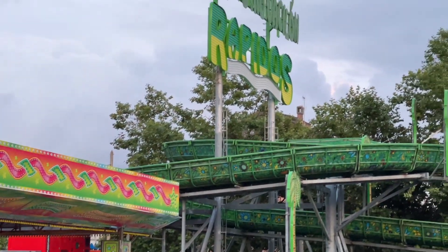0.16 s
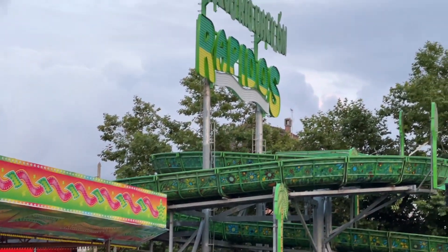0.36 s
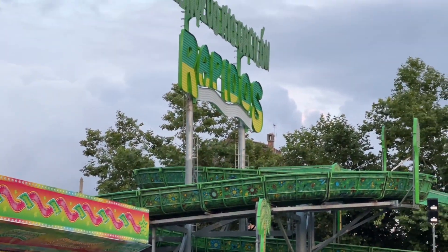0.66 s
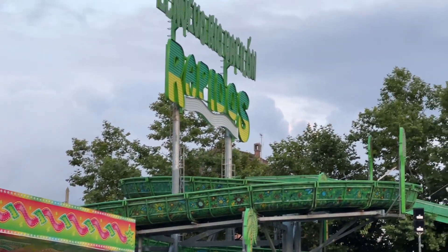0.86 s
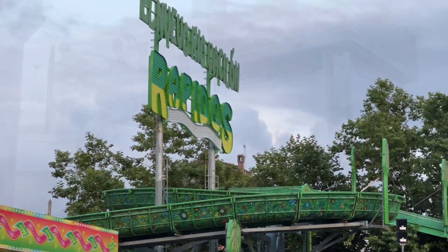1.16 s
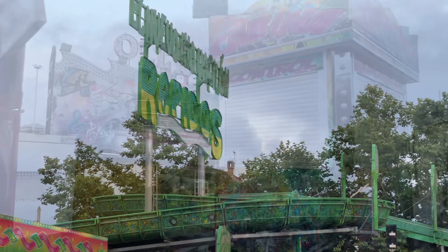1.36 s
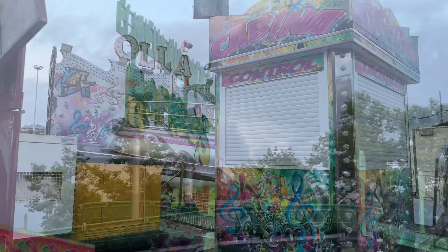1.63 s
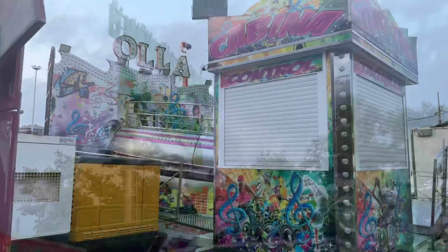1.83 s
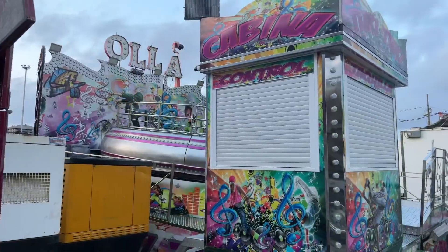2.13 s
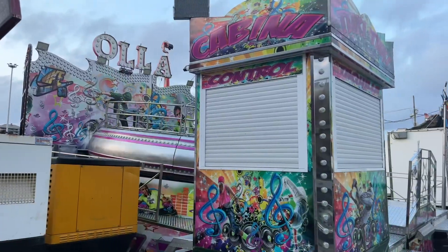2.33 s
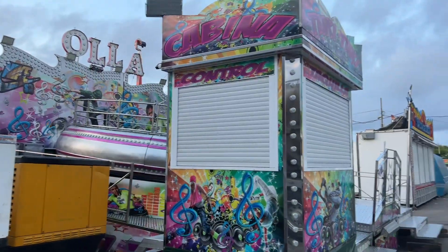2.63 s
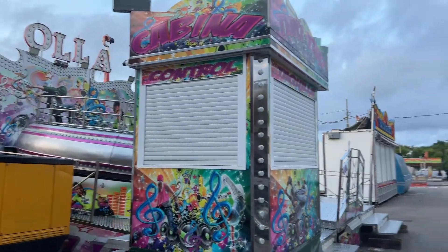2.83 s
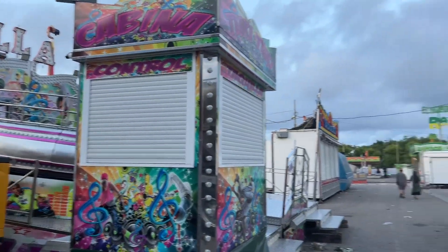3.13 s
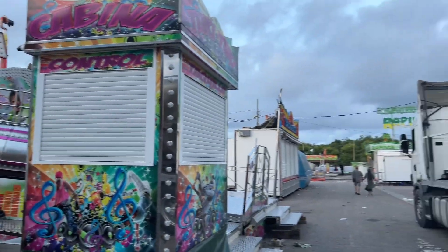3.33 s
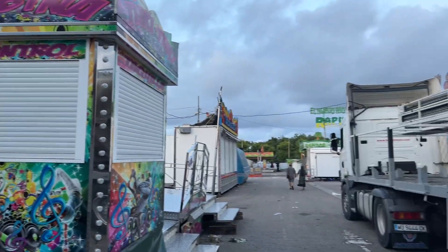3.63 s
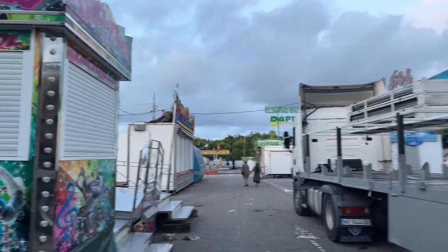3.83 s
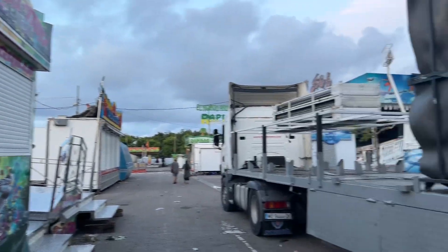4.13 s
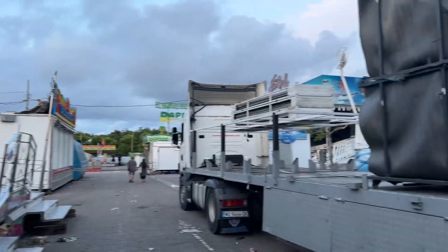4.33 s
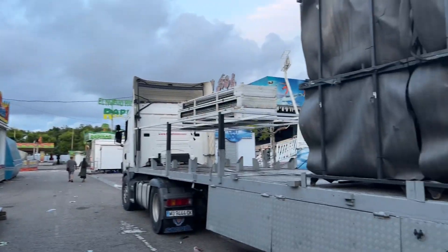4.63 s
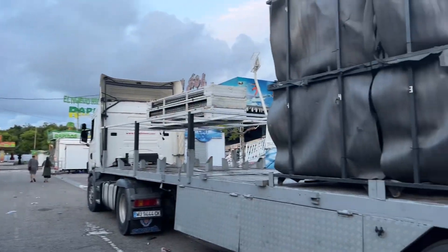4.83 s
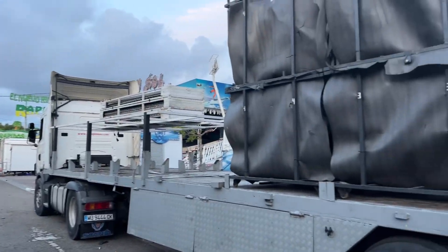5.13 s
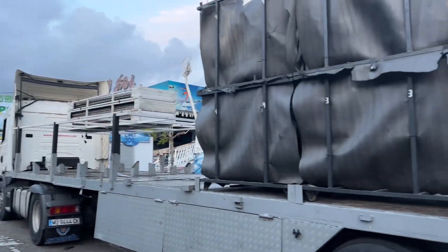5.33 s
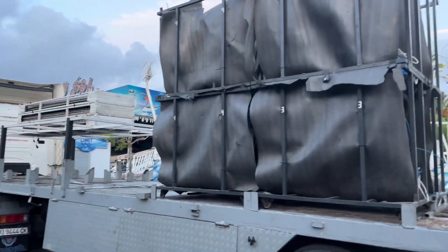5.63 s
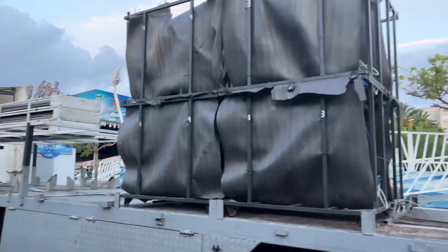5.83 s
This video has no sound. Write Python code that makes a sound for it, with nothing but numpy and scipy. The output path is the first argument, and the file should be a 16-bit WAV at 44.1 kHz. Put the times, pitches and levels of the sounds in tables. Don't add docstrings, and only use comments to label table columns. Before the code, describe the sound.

Quiet far traffic and a brief splash give way to a steady engine drone nearby, with fan hiss, high whine and faint squeals.

```python
import sys
import numpy as np
from scipy import signal
from scipy.fft import rfft, irfft, next_fast_len
from scipy.io import wavfile
from scipy.ndimage import uniform_filter1d

SR = 44100
rng = np.random.default_rng(int(sys.argv[2]) if len(sys.argv) > 2 else 0)


def log_audio(samples):
    frames = np.atleast_2d(samples).T
    limited = np.clip(frames, -1, 1)
    pcm = np.round(limited * 32767).astype(np.int16)
    wavfile.write(sys.argv[1], SR, pcm)


def makeup_ratio(level_db):
    decades = np.asarray(level_db, float) / 20
    return 10 ** decades


N = 263718
HOP = 256
T = np.arange(N) / SR
HZ = np.arange(2 * HOP + 1) * SR / (4 * HOP)
FRAMES = np.arange(N // HOP + 2) * HOP / SR

# (time [s], share of the straight sound that bounces off the lorry [0-1])
TURN = [
    (2.8, 0.034),
    (3.6, 0.17),
    (4.3, 0.8),
    (5.98, 1.),
]
# (time [s], share of full amplitude [0-1])
ARRIVAL = [
    (1.13, 0.0073),
    (1.4, 0.18),
    (1.7, 0.44),
    (2.15, 0.71),
]
PARK_FADE_S = 1, 2.4
CLOSING_S = 4.15, 6
LEFT_LAG_MS = 0.25, -0.332
PORT_GAP_M, MIC_LOW_HZ = 0.13, 28

# (multiple of the firing rate, level [dB], left minus right [dB])
EXHAUST = [(2, 4, -0.5), (3, 7, -5.5), (4, 4, 0.5), (5, -3.5, -8.5), (6, -13, 10), (7, -16.5, -11),
           (9, -15.5, -18), (11, -14.5, -1)]
FIRE_HZ, FIRE_START = 39.035, .436
SILENCER_BEND, SILENCER_LAG = -.17, .86

# (frequency [Hz], level [dB per Hz])
CASING = [(33, -6), (62, 1.5), (100, -2.5), (135, 2.5), (170, 0), (215, -7), (360, -3), (440, -5.5),
          (640, -13), (790, -5.5), (1150, -6.5), (1500, -12), (2300, -16.5), (4000, -41)]
# (frequency [Hz], level [dB per Hz])
FAN = [(1500, -12.5), (2300, -1), (2750, -0.5), (2950, -3.5), (4300, -2.5), (5200, 0.5), (7000, -0.5),
       (9000, -6), (10200, -9.5), (11200, -8.5), (13000, -11.5), (14600, -15), (15600, -14)]
# (frequency [Hz], left minus right [dB])
CASING_PAN = [(60, -3), (110, 0.5), (200, -5), (380, -2.0), (700, 0.0), (1290, 2), (2380, -2.5), (4400, 3),
              (8120, 2.5), (15000, -4.5)]
# (frequency [Hz], share that comes straight [0-1])
CASING_DIRECT = [(60, 0.47), (300, 0.49), (700, 0.64), (1500, 0.64), (3000, 0.55), (7000, 0.7), (10000, .4),
                 (14000, .1)]
# (frequency [Hz], phase by which they part the ports [radians])
ECHO_SPREAD = [(800, 0.042), (2000, 1.06), (3500, 2.36), (9000, 1.94), (14000, 3.5)]
EXHAUST_DB, CASING_DB, FAN_DB, LOUVRE_DB = -27, -33, -42.5, -0.8
LORRY_CASING_DB, LORRY_LOUVRE_DB = 1.94, 4
CLOSING_FAN_DB, CLOSING_LOUVRE_DB = 2.5, 2
LORRY_DIRECT = 1.14

# (frequency [Hz], width [Hz], level [dB])
PANELS = [(33, 5, -54), (51, 7, -47), (334, 5, -51), (421, 30, -52), (790, 100, -49.5), (1130, 40, -55),
          (1740, 160, -55), (2682, 32, -59), (6050, 90, -62), (7390, 27, -66.5), (11717, 80, -70)]
PANEL_DB = 36

WHISTLE_HZ = [4420, 4530, 4590, 4650, 4700, 4722, 4760, 4795, 4830, 4885]
WHISTLE_DB = [-4, 0, 5, -3, 4.5, 1, -1, 4, -1, 0]
WHISTLE_SLOPE = 0.058
WHISTLE_FOLLOW = .3
WHISTLE_SKIRT = 4630, 420, -8.5
WHISTLE_REST_HZ, SURGE_S = 4718, 0.04
# (time [s], level [dB])
BOOST = [(1.3, -35), (2.35, -37.5), (2.66, -35), (3.0, -37.5), (3.2, -40.5), (3.5, -37.5), (4.85, -39.5),
         (5.33, -33.5), (5.6, -35), (5.95, -35)]
# (time [s], pitch rise [Hz])
SURGES = [(1.86, 80), (2.12, 80.5), (2.588, 66), (2.88, 58), (3.45, 44.3), (3.63, 54.5), (4.35, 40),
          (4.75, 40), (5.0, 110), (5.52, 55.2), (5.97, 101.5)]
# (time [s], left minus right [dB])
WHISTLE_AIM = [
    (2.9, 3.5),
    (4.45, -2.5),
    (5.4, 7),
    (5.98, 7),
]

# (start [s], end [s], frequency [Hz], width [Hz], level [dB])
BRIEF = [
    (1.703, 2.8, 6800, 44, -52),
    (4.51, 5.031, 6885, 50, -50),
    (5.157, 5.34, 593, 14, -40),
    (5.824, 5.997, 491.8, 4, -37),
]

# (frequency [Hz], level [dB per Hz])
PARK = [(30, -22), (52, -2), (65, -6.5), (85, 0.5), (135, -13), (156, -4.5), (190, -13.5), (310, -16),
        (560, -22), (640, -28.5), (1140, -31), (1900, -35.5), (9500, -58.5), (14000, -74)]
# (frequency [Hz], likeness of left and right [0-1])
PARK_ALIKE = [(80, .98), (300, .87), (700, .45), (1500, .2), (2200, .85), (3800, .93), (4300, 1.),
              (8800, 1.), (9000, .2)]
PARK_DB = -39.5
# (frequency [Hz], level [dB per Hz])
SPRAY = [(290, -47), (500, -12), (543, -13), (839, -14), (911, -9.5), (3560, -21), (8640, -32),
         (13000, -80)]
# (time [s], level [dB])
GUSHES = [
    (0.12, -52),
    (0.19, -51),
    (0.245, -51.5),
    (0.295, -53.5),
]
GUSH_ATTACK_S, GUSH_FALL_DB_PER_S, TRICKLE_DB = 0.013, 46, -61.5

# (low [Hz], high [Hz], share of blocks silent [0-1])
SUM_DROPPED = [(9650, 10150, .95), (10150, 10380, 1), (10380, 10750, .6), (10750, 11050, .3),
               (13100, 14450, 1), (14450, 14750, .25), (15750, 22050, 1)]
# (low [Hz], high [Hz], share of blocks silent [0-1])
DIFFERENCE_DROPPED = [(11200, 11500, .2), (11500, 11700, .7), (11700, 12400, 1), (12400, 13050, .6),
                      (13050, 13300, .15), (14300, 14700, .25), (14700, 15200, .6), (15200, 22050, 1)]


def exhaust():
    crank = 2 * np.pi * (FIRE_HZ * T + FIRE_START) + 0.022 * walk(3.06)[0]
    breath = walk(5.5, count=len(EXHAUST))
    hum = 0
    for (k, db, pan), b in zip(EXHAUST, breath):
        wave = np.cos(k * crank + SILENCER_BEND * (k - 3) ** 2 - SILENCER_LAG)
        hum = hum - makeup_ratio(db + .9 * b) * wave * sides(pan)[:, None]
    return level(hum, EXHAUST_DB - 0.7)


def casing():
    closing = np.interp(FRAMES, CLOSING_S, [0, 1])
    louvre_db = LOUVRE_DB + LORRY_LOUVRE_DB * curve(TURN, FRAMES) + CLOSING_LOUVRE_DB * closing
    louvre_shape = np.exp(-np.log(HZ[:, None] / 2400 + 1e-9) ** 2 / 0.14)
    body = level(rush(CASING), CASING_DB, 0., 318.0, 1040.0)
    fan = level(rush(FAN, louvre_db * louvre_shape), FAN_DB, 0., 6020.0, 8130.0)
    body = body * makeup_ratio(LORRY_CASING_DB * curve(TURN, T))
    return body + fan * makeup_ratio(CLOSING_FAN_DB * np.interp(T, CLOSING_S, [0, 1]))


def panels():
    sway = walk(3.5, count=len(PANELS))
    hums = 0
    for (hz, width, db), s in zip(PANELS, sway):
        alike = .9 if hz < 500 else .4
        hums = hums + makeup_ratio(db + 3.3 * s) * ring(hz, width, alike)
    return hums * makeup_ratio(CASING_DB + LORRY_CASING_DB * curve(TURN, T) + PANEL_DB)


def whistle():
    turns = walk(3.3, count=len(WHISTLE_HZ))
    surge = sum(rise * np.exp(-((T - at) / SURGE_S) ** 2 / 2) for at, rise in SURGES)
    pitch = WHISTLE_REST_HZ + surge + 11. * walk(14)[0]
    bend = WHISTLE_FOLLOW * (pitch - pitch.mean())
    shaded_db = -8. * curve(TURN, T)
    skirt_hz, skirt_width, skirt_db = WHISTLE_SKIRT
    song = makeup_ratio(skirt_db) * ring(skirt_hz, skirt_width, 0.22)
    for hz, db, turn in zip(WHISTLE_HZ, WHISTLE_DB, turns):
        gain = makeup_ratio(db + 2. * turn - WHISTLE_SLOPE * abs(hz - pitch) + shaded_db * (hz < 4620))
        song = song + gain * ring(hz + bend, 24.3, 0.34)
    song = song / np.sqrt(uniform_filter1d(song ** 2, int(.2 * SR)))
    return song * makeup_ratio(curve(BOOST, T)) * sides(curve(WHISTLE_AIM, T) + 1.5 * walk(2.9)[0])


def rush(table, shift_db=0):
    bounce = np.clip(curve(TURN, FRAMES), 0, 1)
    share = np.clip(on_hz(CASING_DIRECT)[:, None] * LORRY_DIRECT ** bounce, 0, 1)
    straight = 0
    for lag_ms, part in zip(LEFT_LAG_MS, (1 - bounce, bounce)):
        turn = np.exp(-1j * np.pi * HZ * (HZ < 10000) * lag_ms / 1000)[:, None]
        straight = straight + np.sqrt(part) * grains() * np.array([turn, turn.conj()])
    echoes = np.exp(.5j * np.clip(on_hz(ECHO_SPREAD), 0, 3)[:, None] * field(5, 50))
    straight = straight * np.array([echoes, echoes.conj()])
    scattered = pair(np.sinc(2 * HZ * PORT_GAP_M / 343))
    spectra = np.sqrt(share) * straight + np.sqrt(1 - share) * scattered
    spectra = spectra * makeup_ratio(shift_db) * sides(on_hz(CASING_PAN))[:, :, None]
    unrest = patches(1.1, 3, 30) * patches(.9, 60, 5) * patches(1., 8, 8)
    return colour(sound(spectra * unrest), table)


def brief_tones():
    out = 0
    for start, end, hz, width, db in BRIEF:
        on = uniform_filter1d(1. * ((T > start) & (T < end)), int(0.026 * SR))
        tone = ring(hz, width, 0.96)
        out = out + makeup_ratio(db) * on * tone / np.sqrt(uniform_filter1d(tone ** 2, int(.1 * SR)))
    return out


def splash_gain():
    power = makeup_ratio(TRICKLE_DB) ** 2
    for start, db in GUSHES:
        rise = np.clip(1 + (T - start) / GUSH_ATTACK_S, 0, 1)
        fall = makeup_ratio(db - GUSH_FALL_DB_PER_S * np.maximum(T - start, 0))
        power = power + (rise * fall) ** 2
    return np.sqrt(power)


def park():
    alike = on_hz(PARK_ALIKE)
    far = colour(sound(pair(alike) * patches(1.9, 4, 20)), PARK)
    spray = colour(sound(pair(alike) * patches(1.1, 30, 6)), SPRAY)
    far = level(far, PARK_DB, 0., 28.8, 600.) * sides(-1.4)[:, None]
    return far + level(spray, -0.25, 0., 1800.0, 9000.) * splash_gain()


def level(x, db, start=0., lo_hz=20., hi_hz=17000.):
    band = signal.sosfilt(signal.butter(4, [lo_hz, hi_hz], "bandpass", fs=SR, output="sos"), x)
    return x * makeup_ratio(db) / np.sqrt(np.mean(band[..., int(start * SR):] ** 2))


def curve(table, t, column=1):
    rows = np.array(table, float)
    return np.interp(t, rows[:, 0], rows[:, column])


def on_hz(table, hz=HZ):
    rows = np.array(table, float)
    return np.interp(np.log(hz + 1), np.log(rows[:, 0]), rows[:, 1])


def walk(rate, count=1):
    k = int(SR / rate)
    held = np.repeat(rng.standard_normal((count, N // k + 1)), k, axis=1)
    return 1.21 * uniform_filter1d(uniform_filter1d(held, k), k)[:, :N]


def ring(hz, width, alike):
    noise = rng.standard_normal((3, N)) + 1j * rng.standard_normal((3, N))
    pole = np.exp(-np.pi * width / SR)
    mixed = np.sqrt(alike) * noise[0] + np.sqrt(1 - alike) * noise[1:]
    slow = signal.lfilter([1], [1, -2 * pole, pole ** 2], mixed)
    y = np.real(slow * np.exp(2j * np.pi * np.cumsum(hz + 0 * T) / SR))
    return y / y.std()


def sides(pan_db):
    return makeup_ratio(np.array([pan_db, -pan_db]) / 2)


def grains():
    noise = rng.standard_normal(N + HOP)
    return signal.stft(noise, nperseg=4 * HOP, noverlap=3 * HOP)[2][:, :len(FRAMES)]


def pair(alike):
    alike = np.clip(alike, -1, 1)[:, None]
    mid = np.sqrt((1 + alike) / 2) * grains()
    side = np.sqrt((1 - alike) / 2) * grains()
    return np.array([mid + side, mid - side])


def field(bins, frames):
    z = rng.standard_normal((len(HZ), len(FRAMES)))
    z = uniform_filter1d(uniform_filter1d(z, bins, axis=0), frames, axis=1)
    return z / z.std()


def patches(db, bins, frames):
    return makeup_ratio(db * field(bins, frames))


def sound(spectra):
    return signal.istft(spectra, nperseg=4 * HOP, noverlap=3 * HOP)[1][..., :N]


def colour(x, table):
    size = next_fast_len(N)
    gain = makeup_ratio(on_hz(table, np.arange(size // 2 + 1) * SR / size))
    return irfft(rfft(x, size) * gain, size)[..., :N]


def drop_bands(spectrum, bands):
    luck = np.repeat(rng.random((len(bands), N // HOP)), 5, axis=1)[:, :spectrum.shape[1]]
    keep = np.ones(spectrum.shape)
    for (lo, hi, share), chance in zip(bands, luck):
        keep[(HZ > lo) & (HZ <= hi)] = chance >= share
    return spectrum * keep


def scene():
    leaving = np.interp(T, PARK_FADE_S, [1, 0])
    arriving = curve(ARRIVAL, T) * (T > ARRIVAL[0][0])
    generator = exhaust() + casing() + panels() + whistle()
    return arriving * (generator + brief_tones()) + leaving * park()


def band_limit(x):
    return signal.sosfilt(signal.butter(12, 17100, fs=SR, output="sos"), x)


def record(dry):
    heard = signal.sosfilt(signal.butter(4, MIC_LOW_HZ, "highpass", fs=SR, output="sos"), dry)
    left, right = signal.stft(heard, nperseg=4 * HOP, noverlap=3 * HOP)[2]
    total = drop_bands(left + right, SUM_DROPPED)
    difference = drop_bands(left - right, DIFFERENCE_DROPPED)
    mix = sound(np.array([total + difference, total - difference]) / 2)
    return band_limit(mix)


dry = scene()
out = record(dry)
log_audio(out)
```